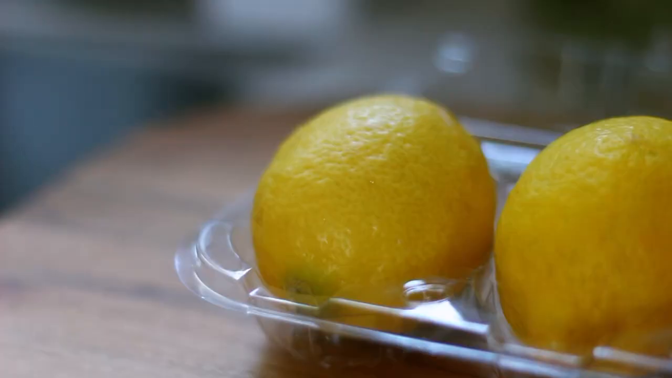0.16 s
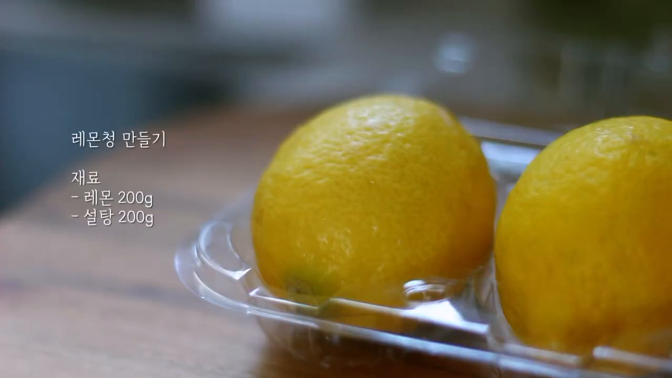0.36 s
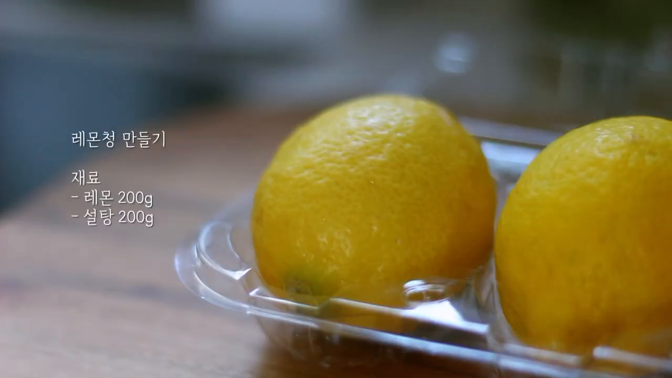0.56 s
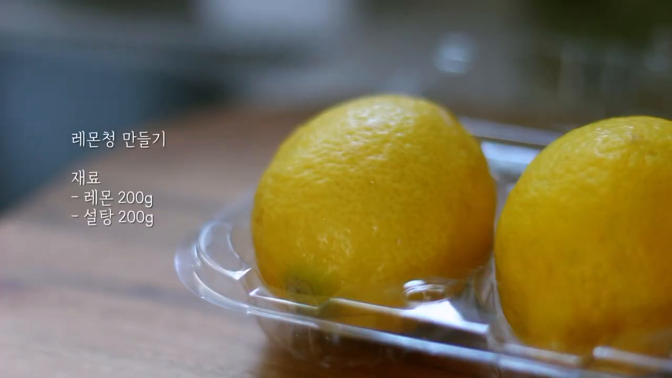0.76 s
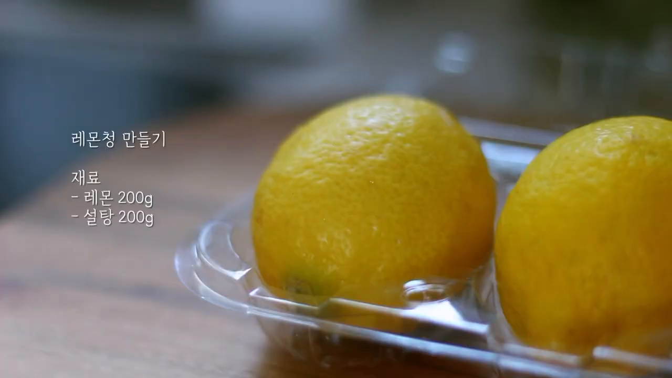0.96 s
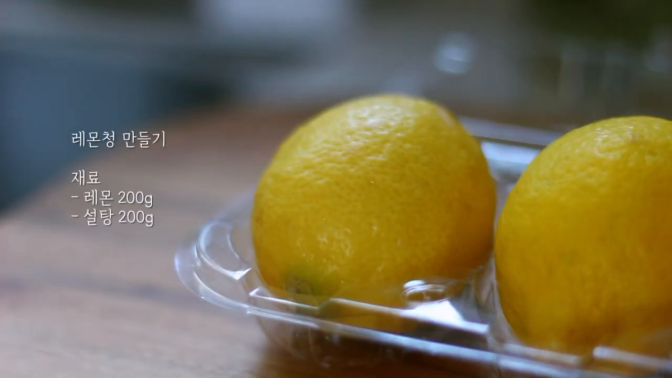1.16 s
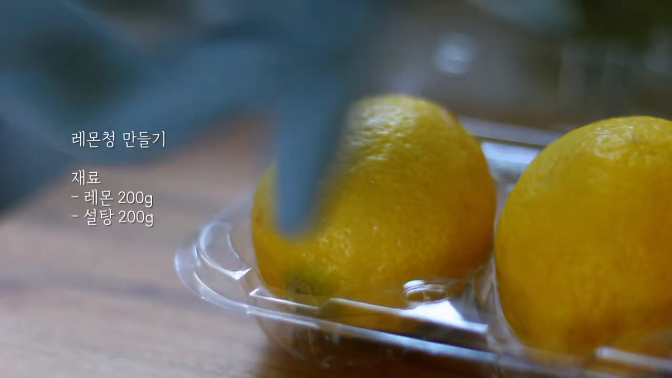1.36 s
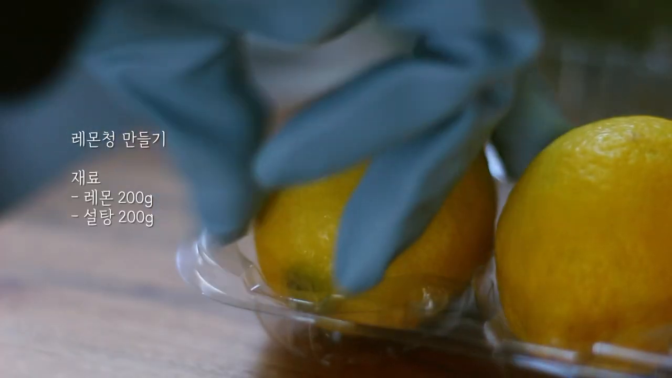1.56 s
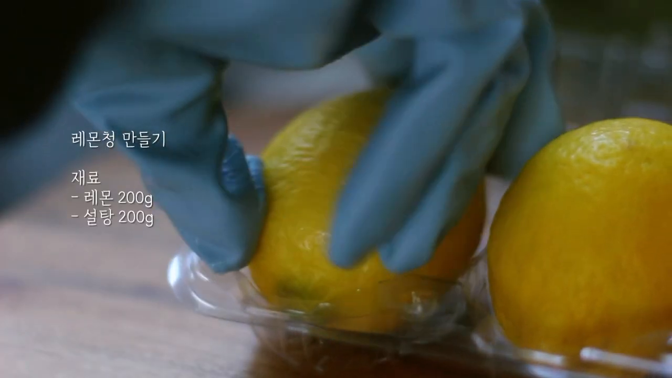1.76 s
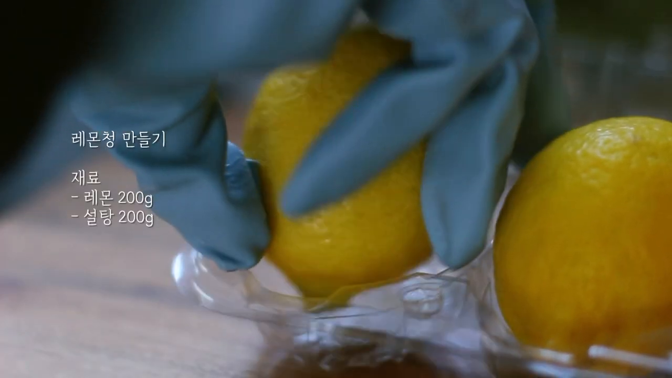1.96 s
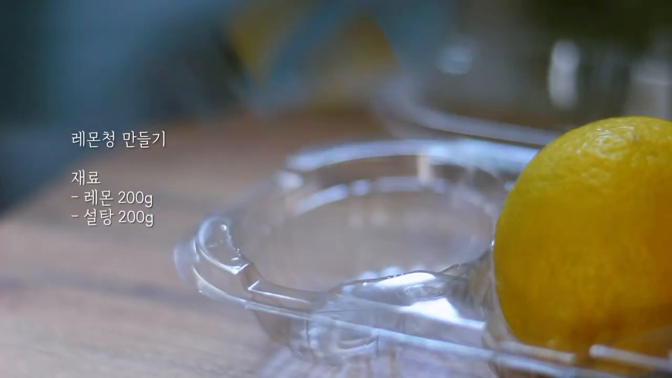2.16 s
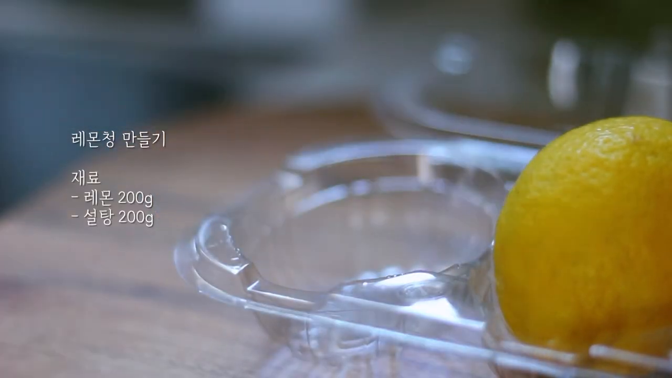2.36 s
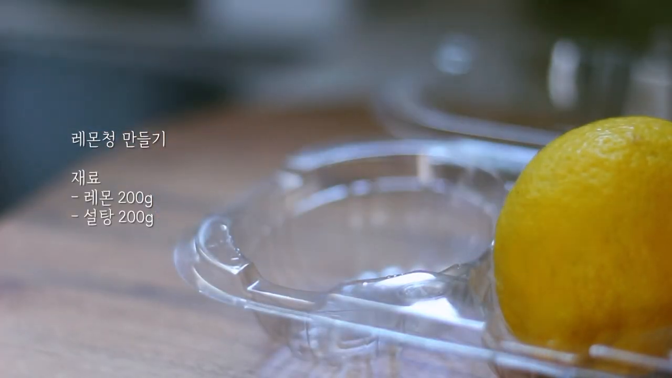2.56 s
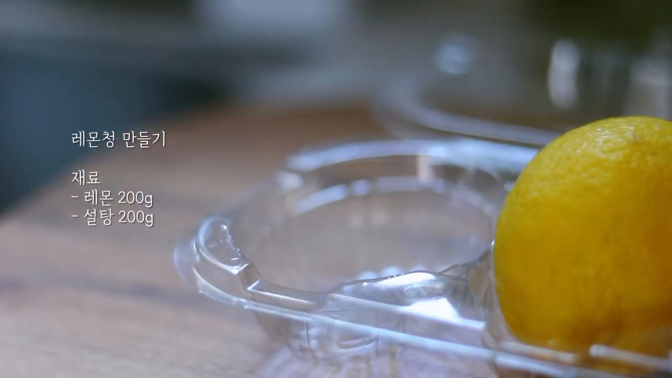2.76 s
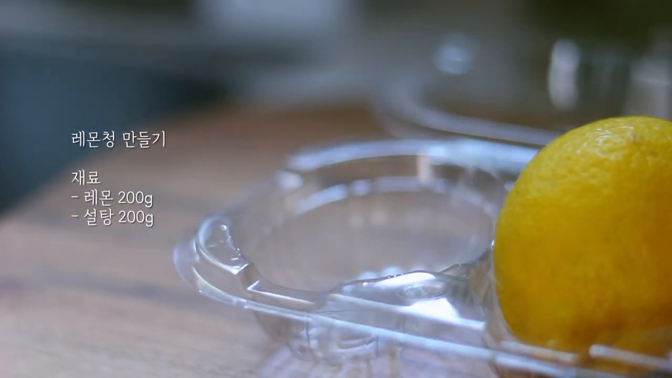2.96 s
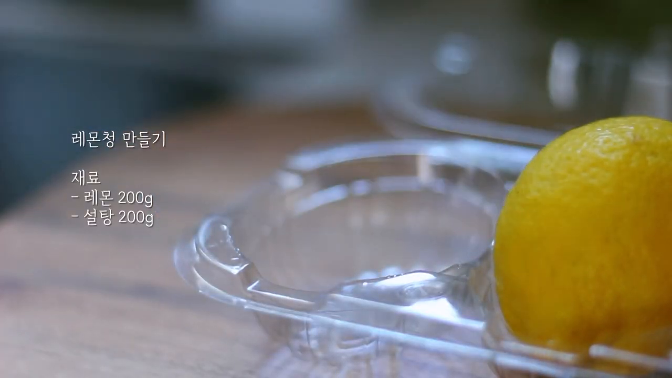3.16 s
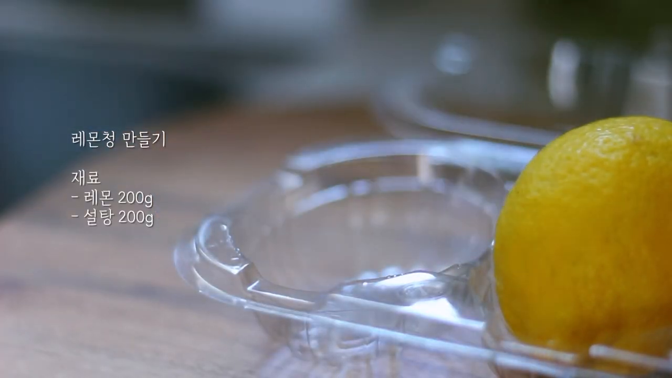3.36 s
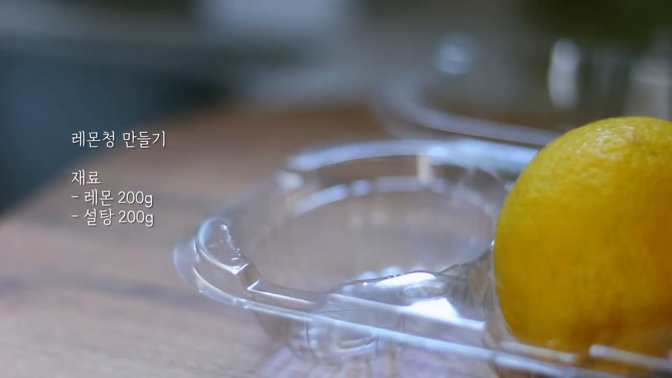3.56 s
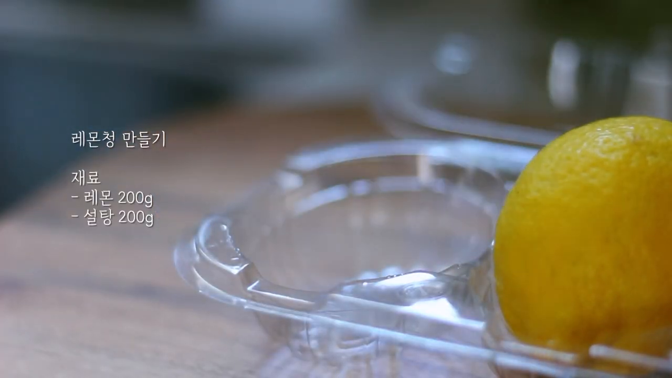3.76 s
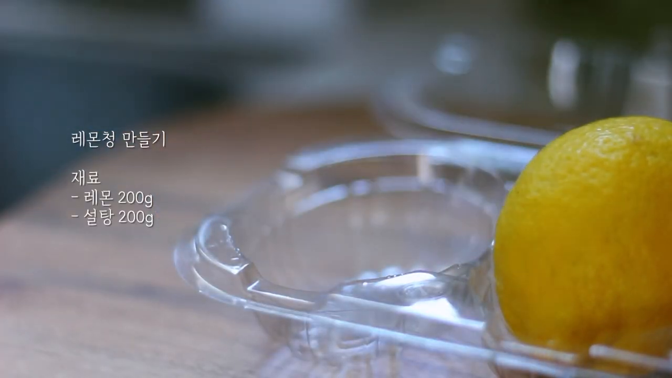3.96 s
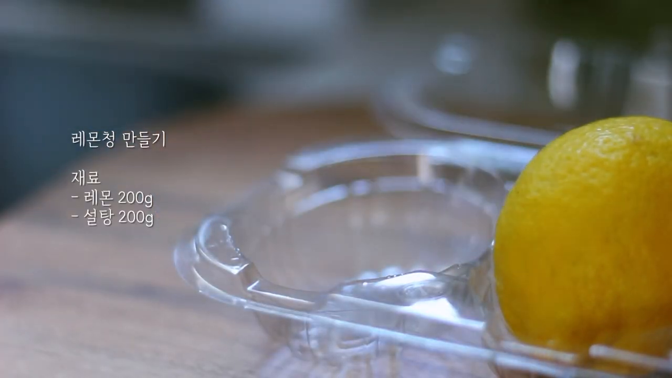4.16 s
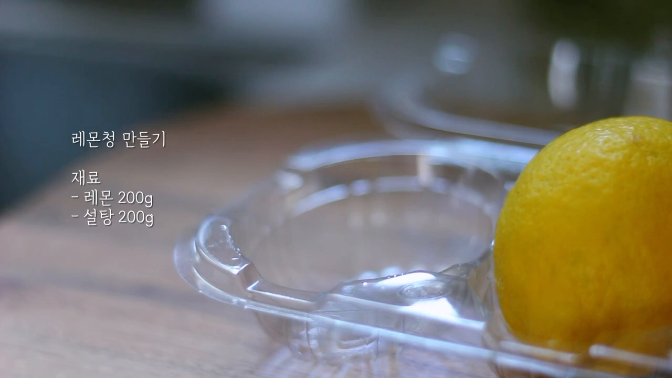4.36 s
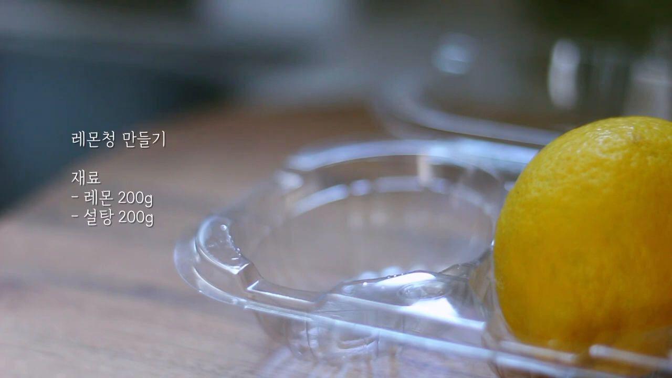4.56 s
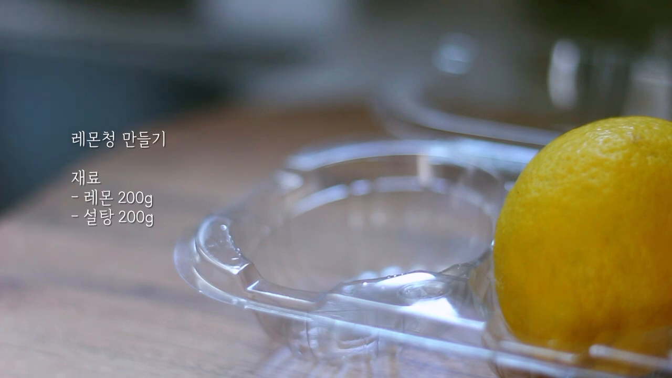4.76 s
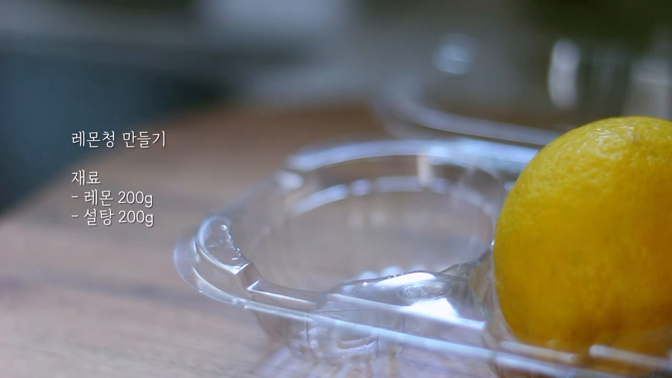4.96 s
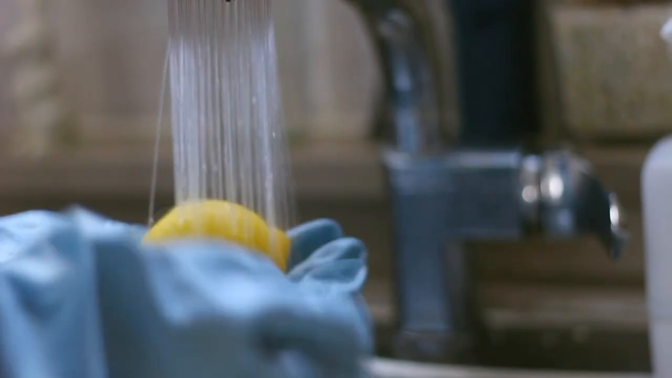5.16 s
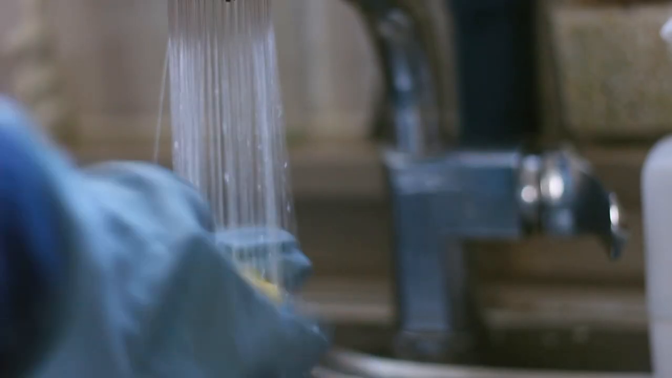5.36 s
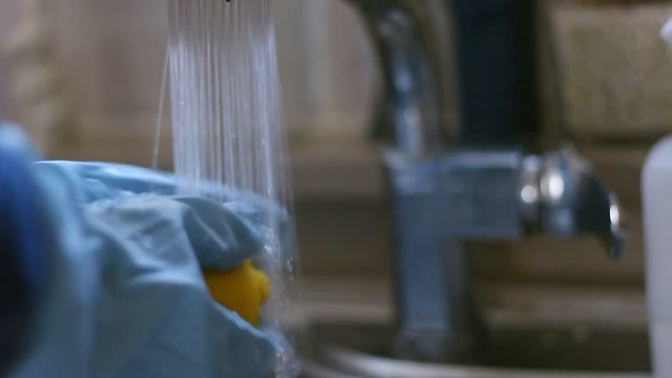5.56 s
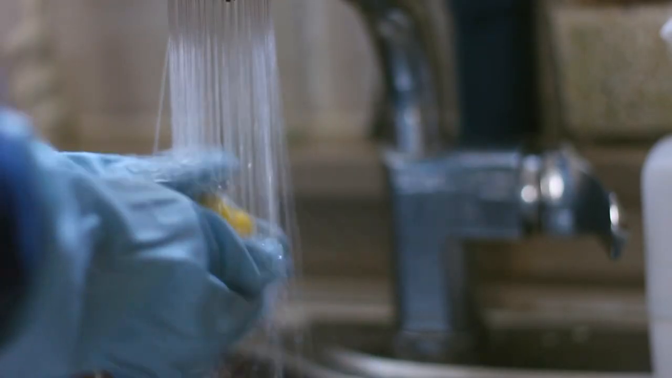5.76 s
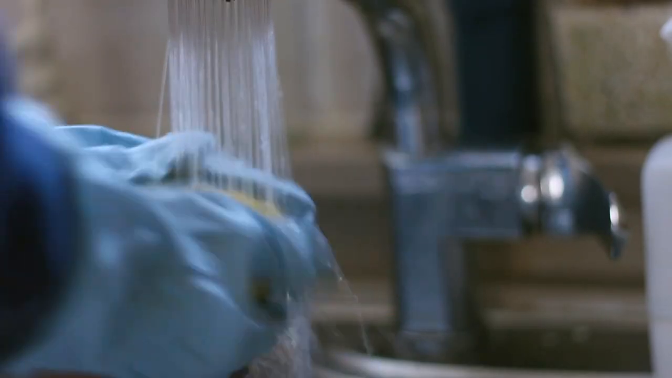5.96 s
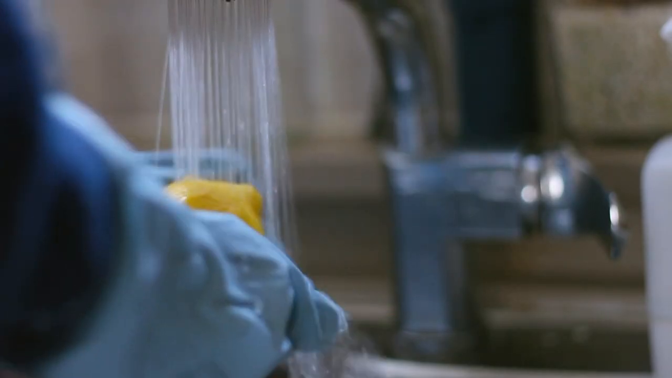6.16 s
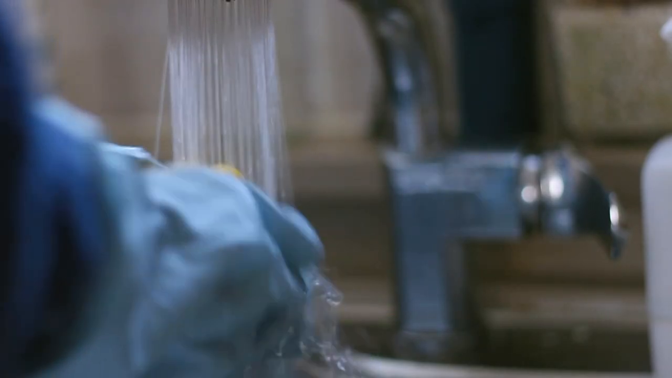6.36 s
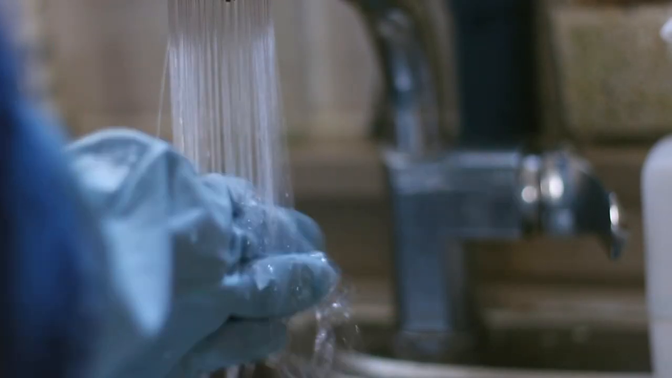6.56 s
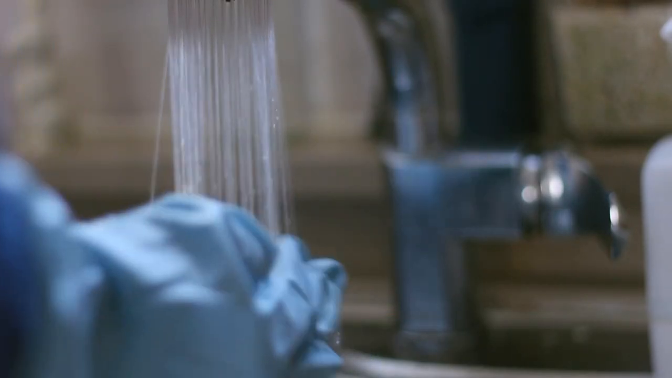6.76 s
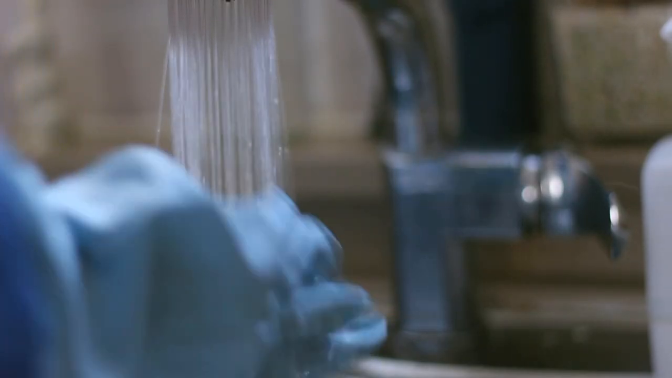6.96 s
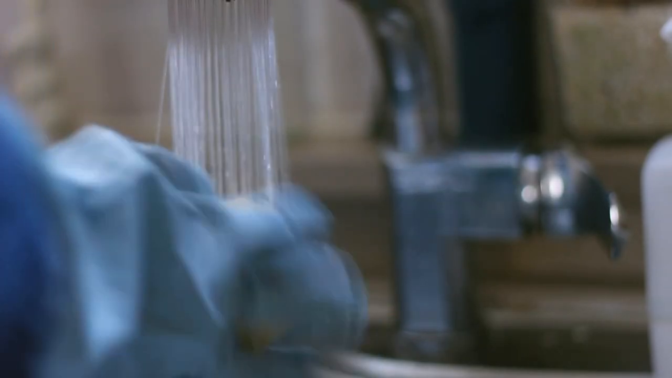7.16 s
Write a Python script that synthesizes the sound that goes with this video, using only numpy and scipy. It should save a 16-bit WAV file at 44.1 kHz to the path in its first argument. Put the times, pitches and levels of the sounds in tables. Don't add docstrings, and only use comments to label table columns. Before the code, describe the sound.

Two sharp plastic pack snaps in a quiet kitchen, light rustles and ticks, then tap spray drums and hisses into a steel sink with splats.

```python
import sys
import numpy as np
from scipy import signal
from scipy.fft import rfft, irfft
from scipy.io import wavfile

SR = 44100
rng = np.random.default_rng(int(sys.argv[2]) if len(sys.argv) > 2 else 0)


def transcribe(u):
    v = np.clip(np.atleast_2d(u).T, -1, 1)
    q = np.round(v * 32767).astype(np.int16)
    wavfile.write(sys.argv[1], SR, q)


def volts(x):
    e = np.asarray(x, float) / 20
    return 10 ** e


N = 317520

# frequency in Hz, level in dB per Hz.
SPATTER_COLOUR = [(4000, -36), (4900, 0), (6100, 7.5), (7500, -3.5), (9200, -1.5), (11500, -13),
                  (16000, -19.5)]
# start in seconds, end in seconds.
GAP_S = (5.0303, 5.0397)


def rms_one(x):
    return x / np.sqrt(np.mean(x ** 2) + 1e-20)


def in_time(rows):
    s, *columns = np.transpose(rows)
    return [np.interp(np.arange(N) / SR, s, c) for c in columns]


def drift(rate):
    r = np.exp(-40 * np.pi * rate / SR)
    white = rng.standard_normal(N // 20 + 2002)
    slow = signal.lfilter([1], [1, -2 * r, r * r], white)[2000:]
    return np.interp(np.arange(N) / 20, np.arange(len(slow)), rms_one(slow))


def resonance(x, hz, width):
    r = np.exp(-np.pi * width / SR)
    feedback = [1, -2 * r * np.cos(2 * np.pi * hz / SR), r * r]
    return signal.lfilter(np.array([1, 0, -1]) * (1 - r * r) / 2, feedback, x)


def coloured(x, spectrum, low=20, high=20000):
    hz = np.maximum(np.fft.rfftfreq(len(x), 1 / SR), 1)
    points = np.array(spectrum)
    band = 1 / np.sqrt((1 + (low / hz) ** 8) * (1 + (hz / high) ** 8))
    colour = volts(np.interp(np.log(hz), np.log(points[:, 0]), points[:, 1]))
    return rms_one(irfft(rfft(x) * band * colour, len(x)))


def grains(per_s, spread_db):
    sizes = volts(spread_db * np.minimum(rng.exponential(1, N), 4)) * rng.choice([-1, 1], N)
    return rms_one(sizes * (rng.random(N) < per_s / SR))


def droplets(per_s, low_hz, high_hz, cycles):
    clicks = grains(per_s, spread_db=4.0) + 1e-18
    dealt = rng.integers(0, 14, N)
    out = np.zeros(N)
    for k, hz in enumerate(np.geomspace(low_hz, high_hz, 14)):
        out += resonance(clicks * (dealt == k) + 1e-18, hz, 1.9 * hz / cycles) / np.sqrt(hz)
    return rms_one(out)


def add(out, s, piece):
    i = round(s * SR)
    out[i:i + len(piece)] += piece[:N - i]


def bursts(events, attack_cycles, t60, wash_t60, wash_db, width, rise, spray_db, focus):
    out, t = np.zeros(N), np.arange(4096) / SR
    noise = rng.standard_normal((len(events), len(t)))
    for (s, peak_db, hz, spatter_db), white in zip(events, noise):
        tone = np.sin(2 * np.pi * hz * t * (1 + rise * hz * t))
        tone = tone * volts(-60 * t / t60) * np.clip(t * hz / attack_cycles, 0, 1)
        tone = resonance(tone, hz, focus * hz)
        wash = rms_one(resonance(resonance(white, hz, width * hz), hz, 2 * width * hz))
        wash = volts(wash_db - 60 * t / wash_t60) * wash
        dying = volts(-60 * t / (0.11 * wash_t60)) + volts(-6.5 - 60 * t / (1.34 * wash_t60))
        spatter = volts(spray_db + spatter_db) * dying * coloured(white, SPATTER_COLOUR)
        add(out, s, volts(peak_db) * (tone + (wash + spatter) * np.clip(t / 0.00051, 0, 1)))
    return out


def snaps():
    snap_times = [
        0.3683,
        0.4969,
    ]
    # peak level in dB, cup ring in dB, table thump in dB.
    snap_levels = [
        (-0.3, -17, -55.5),
        (-2.5, -28.5, -49.5),
    ]
    # seconds after its start, level in dB.
    snap_cracks = [
        [(.0003, 4), (.0008, 0), (.0014, -2), (.002, -8)],
        [(.0003, -3), (.0009, 1), (.0017, -12), (.0026, -6)],
    ]
    # frequency in Hz, width in Hz, level in dB.
    sheet_modes = [
        [(2170, 110, -8.5), (2950, 130, -14.5), (4180, 212, -13), (5860, 280, -12), (6620, 400, -9.5),
         (7590, 270, -14.5), (9050, 250, -10.5), (9590, 400, -16.5), (3540, 270, -19), (12260, 260, -15),
         (13000, 180, -9), (13640, 108.3, -12.5), (14040, 247, 0), (15200, 240, -18.5)],
        [(2960, 234, -9.5), (4240, 147, -11.5), (3650, 250, -19), (6810, 270, -5), (7600, 120, -9.5),
         (8030, 200, -6), (8580, 201, -7.5), (10300, 150, -14.5), (11100, 290, -9), (12380, 340, -6.5),
         (13130, 230, -1), (13280, 277, -1.5), (14350, 400, -6.5), (2270, 140, -9.5)],
    ]
    # frequency in Hz, level in dB per Hz.
    kitchen_echo = [
        [(220, -47), (380, -3), (801, -2.5), (1150, -5), (3890, -14.5), (6900, -6), (8600, -7), (11100, -15.5),
         (14000, -0.5), (16000, -33)],
        [(180, -22), (801, 3.5), (2800, -22), (5200, -18), (7300, -0.5), (8600, -3), (10500, -13), (13200, 0.5),
         (14600, -14.5), (16000, -31)],
    ]
    out, t = np.zeros(N), np.arange(8000) / SR
    for s, (peak_db, cup_db, thump_db), cracking, modes, echo in zip(
            snap_times, snap_levels, snap_cracks, sheet_modes, kitchen_echo):
        crack_shape = sum(volts(db - 24000 * (t - at)) * (t > at) for at, db in cracking)
        cracks = rng.choice([-1, 1], len(t)) * crack_shape
        kicks = [1.0 * (np.arange(len(t)) == round(at * SR)) for at, db in cracking]
        ringing = np.zeros(len(t))
        for k, (hz, width, db) in enumerate(modes):
            mode = resonance(resonance(kicks[k % 3], hz, 3000), hz, 0.94 * width)
            ringing += volts(db) * mode * (-1) ** k
        body = rms_one(ringing) + volts(-19.0) * rms_one(resonance(sum(kicks), 940, 1800))
        body += volts(-9.0) * rms_one(resonance(cracks, 11500, 6000))
        cup = volts(cup_db - 60 * t / 0.038) * np.sin(2 * np.pi * 801 * t) * np.clip(t / 0.0025, 0, 1)
        thump = volts(thump_db - 60 * t / 0.25) * np.sin(2 * np.pi * 28.3 * t)
        tail = coloured(rng.standard_normal(len(t)), echo)
        tail = tail * volts(-33.0 - 60 * t / 0.17) * np.clip(t / 0.00069, 0, 1)
        add(out, s, volts(peak_db) * (body / np.abs(body).max() + tail) + cup + thump)
    return out


def stroke_gains():
    # peak time in seconds, rub in dB, crackle in dB, length in seconds.
    hand_strokes = [(0.035, -56, -57.5, 0.037), (0.238, -60, -57, 0.14), (0.503, -53, -47.5, 0.07),
                    (0.664, -56, -55.5, 0.085), (0.932, -63.5, -62, 0.23), (1.147, -69.5, -82, 0.41),
                    (1.432, -57.5, -71, 0.026), (1.529, -44, -47, 0.015), (1.58, -56.5, -60, 0.061),
                    (1.7, -54.5, -74, 0.033), (1.763, -50.5, -52.5, 0.053), (1.894, -58, -63, 0.11),
                    (1.983, -53.5, -62, 0.04), (2.086, -56, -74, 0.034), (2.327, -69, -74, 0.47),
                    (2.5, -71.5, -63, 0.078), (2.59, -46.5, -50, 0.017), (2.622, -45, -48, 0.018),
                    (2.697, -48, -49, 0.05)]
    t, power = np.arange(0, N / SR, 1 / 1000), 1e-20
    for s, rub_db, crackle_db, length in hand_strokes:
        away = (t - s) / np.where(t < s, 0.89 * length, length)
        power = power + volts(2 * (np.array([[rub_db], [crackle_db]]) - 10 * away ** 2))
    return [np.interp(np.arange(N) / SR, t, gain) for gain in np.sqrt(power)]


def rustle():
    # frequency in Hz, level in dB per Hz.
    rub_colour = [(250, -23), (450, -9), (900, -0.5), (2000, -1), (3800, -1.5), (4900, -24.5)]
    rub, crackle = stroke_gains()
    slips = rng.standard_normal((2, N)) + 0.4 * grains(per_s=2800, spread_db=1.5)
    slips = slips * volts(1.5 * drift(40))
    tiny_rings = droplets(per_s=6000, low_hz=1200, high_hz=3900, cycles=30.0)
    dull = rms_one(coloured(slips[0], rub_colour) + 0.5 * tiny_rings)
    bright = volts(-11.0) * coloured(slips[1], SPATTER_COLOUR, high=9100)
    fade = np.clip((2.74 - np.arange(N) / SR) / 0.016, 0, 1)
    return fade * (rub * dull + crackle * bright)


def pack_ticks():
    # start in seconds, peak level in dB, pitch in Hz, brightness in dB.
    sheet_ticks = [(0.607, -32, 1240, -27), (0.662, -32.5, 1310, -6), (0.89, -40.5, 1435, 1),
                   (1.184, -44.5, 1554, -23), (1.212, -46, 1750, -17), (1.298, -37, 1600, -19),
                   (1.317, -36.5, 1410, -28), (1.417, -44, 2180, -24), (1.512, -33, 2434, -11),
                   (1.526, -22, 2380, -42), (1.608, -35, 970, -24), (1.678, -32.5, 1500, -20),
                   (1.701, -34, 1195, -25.5), (1.7136, -19.5, 2300, -20), (1.789, -26.5, 2900, -5),
                   (1.8463, -21, 1710, -30), (1.9105, -29.5, 1090, -25), (1.916, -28.5, 2200, -14),
                   (1.928, -35, 2700, -20), (1.985, -36, 2000, -8), (1.975, -30, 2220, -27.5),
                   (2.054, -38.5, 1940, -15), (2.083, -34.5, 2060, -7.5), (2.23, -41, 2180, -25),
                   (2.235, -36, 1870, -28), (2.254, -42, 1912, -26.5), (2.397, -36, 3580, -19),
                   (2.424, -34.5, 3490, -12.5), (2.491, -26.5, 2720, -8), (2.529, -51, 2500, 6),
                   (0.136, -34, 930, -13),
        (0.216, -30.5, 750, -14),
        (0.27, -32, 920, -22),
        (0.555, -31, 960, -24),
        (1.537, -25, 1800, -24),
        (1.564, -43, 1520, 0),
    ]
    ticks = bursts(sheet_ticks, attack_cycles=0.029, t60=0.0033, wash_t60=0.071,
                   wash_db=-21.5, width=0.35, rise=0.001, spray_db=-11.0, focus=4.4)
    band = signal.butter(2, [600, 8000], "band", fs=SR, output="sos")
    return signal.sosfilt(band, ticks)


def spurts(per_s, t60, depth):
    r = volts(-60 / (t60 * SR))
    jumps = signal.lfilter([1], [1, -r], np.abs(grains(per_s, spread_db=3.5)))
    return rms_one(1 + depth * rms_one(jumps))


def stream_levels(rows, follows):
    # peak time in seconds, flow gain in dB, steel gain in dB.
    gush_events = [
        (2.577, -2.5, 23),
        (2.771, 4, 25),
        (4.13, 1, -2),
        (5.73, 4, 5.5),
        (6.25, 4, 2),
        (6.638, -8, 17.5),
    ]
    # start in seconds, end in seconds, drum change in dB.
    drum_lulls = [
        (4.706, 4.805, -4.5),
        (5.035, 5.085, -11),
    ]
    t, (flow_db, steel_db) = np.arange(N) / SR, in_time(rows)
    for s, flow_gain_db, steel_gain_db in gush_events:
        bell = np.exp(-((t - s) / np.where(t < s, 0.023, 0.05)) ** 2)
        flow_db = flow_db + flow_gain_db * bell
        steel_db = steel_db + steel_gain_db * bell
    drum_db, drum_flow, drum_steel, hiss_db, hiss_flow = follows
    for a, b, loss_db in drum_lulls:
        drum_db = drum_db + np.interp(t, [a - 0.02, a, b - 0.004, b], [0, loss_db, loss_db, 0])
    flow_swing = flow_db - np.median(np.array(rows)[:, 1])
    steel_swing = steel_db - np.median(np.array(rows)[:, 2])
    drum_db = drum_db + drum_flow * flow_swing + drum_steel * steel_swing
    return steel_db, drum_db, flow_db, hiss_db + hiss_flow * flow_swing


def tap(rows, follows, colour, boom, basin):
    boom_db, drum_db, splash_db, hiss_db = stream_levels(rows, follows)
    thud, wet, fine = rng.standard_normal((3, N))
    patter = grains(per_s=2900, spread_db=3.0)

    lowest = volts(boom[2]) * rms_one(resonance(thud, boom[0], boom[1]))
    low = rms_one(coloured(thud, colour, low=95, high=350) + lowest)

    rings = sum(volts(db + 1.5 * drift(16)) * rms_one(resonance(wet, hz, width)) for hz, width, db in basin)
    gurgle = droplets(per_s=180, low_hz=365.7, high_hz=1520, cycles=77.0)
    beating = coloured(thud, colour, low=354, high=1730) * volts(2.33 * drift(37.0))
    drum = rms_one(beating + 0.56 * rings + 0.35 * gurgle)

    walls = sum(volts(5.8 * drift(11.3)) * rms_one(resonance(fine, hz, 26)) for hz in boom[3:])
    drops = droplets(per_s=440, low_hz=1214, high_hz=3990, cycles=40.0)
    breaking = (wet + 0.23 * patter) * spurts(per_s=27, t60=0.04, depth=0.89)
    splash = rms_one(coloured(breaking, colour, low=1160, high=3120) + 0.91 * drops + 0.076 * walls)

    fizz = droplets(per_s=480, low_hz=5140, high_hz=9560, cycles=93.0)
    misting = (fine + 0.5 * patter) * spurts(per_s=21, t60=0.17, depth=1.0)
    spray = coloured(misting, colour, low=3650) + 0.41 * fizz

    out = volts(hiss_db - 19) * coloured(wet, colour, high=126)
    out += volts(boom_db - 1.5) * low + volts(drum_db + 0.5) * drum
    return out + volts(splash_db - 8.0) * splash + volts(hiss_db - 1.5) * spray


def running_water():
    # time in seconds, flow on the hands in dB, jets reaching the steel in dB.
    flow_curves = [
        [(2.73, -51.5, -75), (2.86, -49.5, -62.5), (3.13, -47, -52), (3.74, -45, -51.5), (3.88, -45, -57.5),
         (4.08, -45, -51), (4.66, -46.5, -64), (4.88, -43.5, -56.5), (5.02, -43, -52.5)],
        [(5.05, -44.5, -59), (5.33, -37, -62), (5.46, -40, -52), (5.62, -38, -70), (5.86, -36, -68),
         (6.0, -40.5, -66), (6.25, -41.5, -61.5), (6.95, -36, -61.5), (7.2, -42, -59.5)],
    ]
    # drum in dB, its share of the flow swing, its share of the steel swing,
    # hiss in dB, its share of the flow swing.
    flow_shares = [
        (-50.5, 1, 0.34, -47.5, 1.7),
        (-50.5, 0.1, 0.21, -47.5, 0.28),
    ]
    # frequency in Hz, level in dB per Hz.
    water_colours = [
        [(18, -43), (30, 6), (75, -1), (153, 7.5), (221, 0.5), (649, -8.5), (1390, -12), (3580, -6),
         (4650, -14.5), (6050, -15.5), (8980, -18), (14800, -35), (16000, -45)],
        [(18, -55), (30, -2), (311, 0), (426, -3.5), (649, 0), (740, 1.5), (913, -1.5), (1630, -1), (3770, 5.5),
         (4780, -6.5), (6050, -4.5), (9220, -10.5), (16000, -29)],
    ]
    # lowest basin mode in Hz, its width in Hz, its level in dB, then three wall modes in Hz.
    boom_modes = [
        (148.4, 22, 6.5, 1600, 2800, 2500),
        (186.7, 5.1, -2.5, 1300, 1900, 2800),
    ]
    # frequency in Hz, width in Hz, level in dB.
    basin_modes = [
        [(356.5, 18, -5.5), (482, 21, -5), (659, 27, -1.5), (767, 5.7, -6)],
        [(318, 21, -7), (509, 26, -5.5), (651, 18, -3), (911, 58, 6.5)],
    ]
    takes = zip(flow_curves, flow_shares, water_colours, boom_modes, basin_modes)
    first, second = [tap(*take) for take in takes]
    t = np.arange(N) / SR
    return np.where(t < GAP_S[0], first * np.clip((t - 2.5) / 0.041, 0, 1), second)


def splats():
    # start in seconds, peak level in dB, bubble pitch in Hz, spray in dB.
    heavy_splats = [(3.0868, -32, 2720, -9), (3.098, -21, 3000, -10.5), (3.1803, -22.5, 3200, -18),
                    (3.2464, -27, 3120, -5), (3.3175, -26.5, 3820, -9), (3.481, -29, 3280, -15),
                    (3.5469, -31.5, 3550, -5.5), (3.6365, -33, 3420, -2.5), (3.7509, -25, 3110, -16),
                    (3.7893, -31, 2720, -6), (3.8347, -25, 3900, -4), (4.0965, -23, 3450, -22),
                    (4.1234, -33, 3830, -1.5), (4.2627, -24, 3330, -13.5), (4.3768, -28, 3670, -1.5),
                    (4.4127, -32, 2320, 0), (4.431, -21, 2400, -17), (4.4404, -18.5, 3300, -11),
                    (4.4553, -21, 3700, -19), (4.5613, -17.5, 3230, -16.5), (4.596, -24.5, 2900, -13),
                    (4.621, -28, 3870, -26), (4.6523, -26.5, 3880, -4.5), (4.698, -26, 3700, -5.5),
                    (4.7458, -25, 3450, -7.5), (4.8093, -27.5, 3720, -23), (4.846, -30.5, 3900, -3.5),
                    (4.9034, -25.5, 2280, -18), (4.9762, -26, 2640, -9), (5.0146, -23.5, 3180, -31),
                    (5.072, -26, 3150, -18), (5.107, -29, 2120, -14), (5.1577, -40, 2100, -16),
                    (5.2103, -29, 1990, -15), (5.2717, -26.5, 3000, -12), (5.3012, -25, 3640, -25),
                    (5.3585, -28, 1380, -25), (5.3956, -26, 2480, -16), (5.4083, -20.5, 3030, -9.5),
                    (5.521, -45, 2080, -3), (5.5743, -36, 3620, -12), (5.613, -41, 3440, -4),
                    (5.7409, -25, 2730, -6), (6.007, -29.5, 1980, -42), (6.055, -30.5, 3060, -12),
                    (6.092, -22.5, 3500, -15.5), (6.2, -23.5, 1900, -40), (6.275, -23, 3320, -11.5),
                    (6.298, -21, 2950, -26), (6.343, -25.5, 3500, -11), (6.453, -22, 1520, -28),
                    (6.4815, -30.5, 2480, -6.5), (6.591, -31.5, 2400, -1), (6.635, -28.5, 3330, -12.5),
                    (6.666, -30, 2900, -11), (6.732, -30, 2470, -13), (6.776, -22.5, 2340, -31),
                    (6.834, -30, 3450, -6.5), (6.946, -20.5, 3300, -23), (6.997, -38, 2370, -35),
                    (7.1645, -25.5, 3150, -26)]
    return bursts(heavy_splats, attack_cycles=1.6, t60=0.0052, wash_t60=0.086,
                  wash_db=-11.5, width=0.37, rise=0.0014, spray_db=-2.0, focus=1.0)


def plinks():
    # start in seconds, peak level in dB, pitch in Hz, ring time in seconds.
    ringing_drops = [(2.398, -41, 3580, 0.011), (2.424, -45.5, 3600, 0.013), (3.712, -29.5, 9370, .008),
                     (3.751, -32, 3040, 0.018), (4.43, -29, 2380, 0.034), (5.083, -38, 1540, 0.067),
                     (5.105, -26.5, 2080, 0.024), (5.249, -36, 1285, .04), (5.308, -32, 3650, .03),
                     (5.423, -31, 3240, 0.024), (5.539, -38, 2260, 0.061), (5.574, -34, 3750, .02),
                     (5.597, -31, 1360, 0.032), (5.613, -33, 3680, .025), (5.67, -33, 1830, 0.022),
                     (5.690, -39, 3830, 0.062), (5.808, -34, 3680, 0.022), (5.836, -39, 2720, 0.047),
                     (5.945, -36, 1270, .03), (6.200, -24.5, 3010, 0.025), (6.212, -31.5, 324, 0.084),
                     (6.275, -30, 3740, 0.025), (6.298, -19.5, 3120, 0.02), (6.342, -16.5, 3800, 0.01),
                     (6.411, -30, 1380, .02), (6.454, -22.5, 1413, 0.022), (6.577, -42, 990, 0.019),
                     (6.693, -34, 1330, 0.023), (6.775, -18.5, 3060, 0.015), (6.835, -31.5, 3500, .025),
                     (6.910, -35, 3730, 0.022), (6.947, -37, 3500, 0.069), (6.996, -23, 2460, 0.042),
                     (7.049, -30, 1370, 0.028), (7.057, -38, 4050, 0.05), (7.089, -38, 3730, .03),
                     (7.192, -30.5, 3580, 0.036), (6.990, -27, 907, 0.039), (6.428, -31, 892, 0.061),
                     (7.131, -29.5, 1329, 0.06), (4.562, -24, 3100, 0.013), (3.182, -29, 3420, 0.015),
                     (6.885, -37, 3250, 0.035)]
    out, t = np.zeros(N), np.arange(4096) / SR
    for s, peak_db, hz, ring_s in ringing_drops:
        swell = np.sin(np.pi / 2 * np.clip(t * hz / 5, 0, 1)) ** 2
        tone = np.sin(2 * np.pi * hz * t * (1 + 0.00028 * hz * t))
        add(out, s, volts(peak_db + 1.5 - 60 * t / ring_s) * swell * tone)
    return out


def spits():
    # start in seconds, peak level in dB, pitch in Hz.
    spray_spits = [(2.765, -27, 8110), (2.7733, -27, 9400), (3.05, -35, 6170), (3.0726, -35, 8020),
                   (3.253, -34, 6460), (3.296, -29, 8000), (3.3945, -27, 8250), (3.449, -30, 9500),
                   (3.553, -34, 7320), (3.6182, -38, 6060), (3.697, -39, 6080), (3.7115, -29.5, 9000),
                   (3.737, -36, 6090), (3.7624, -34, 6500), (3.934, -32, 5690), (3.9496, -24.5, 5740),
                   (3.9647, -26.5, 8600), (3.9896, -31, 9330), (4.056, -29, 5600), (4.1829, -41, 5740),
                   (4.219, -31, 6240), (4.2577, -27, 5640), (4.3141, -30, 7300), (4.376, -34, 6100),
                   (4.487, -33, 8150), (4.8704, -31, 8580), (4.9248, -29, 5800), (5.1302, -35, 5380),
                   (5.1886, -33.5, 6180), (5.286, -30, 5700), (5.3133, -31.5, 9050), (5.3354, -37, 5410),
                   (5.4515, -40, 6310), (5.477, -52, 5910), (5.52, -25, 8870), (5.5992, -45, 6070),
                   (5.6317, -30.5, 6230), (5.685, -31, 5960), (5.9728, -31, 5540), (6.0177, -33, 5840),
                   (6.0338, -29, 5570), (6.1749, -34, 5100), (6.2447, -33, 5840), (6.318, -24.5, 5750),
                   (6.3784, -28, 5560), (6.403, -30, 7200), (6.4587, -37, 6030), (6.5112, -24.5, 4680),
                   (6.534, -30.5, 6300), (6.5917, -37, 5720), (6.694, -23.5, 5860), (6.761, -32.5, 5800),
                   (6.877, -26.5, 6500), (6.9386, -33, 5840), (7.0359, -36, 5390)]
    return bursts([(*spit, -10) for spit in spray_spits], attack_cycles=5.7, t60=0.0056, wash_t60=0.094,
                  wash_db=-18.0, width=0.13, rise=0.0012, spray_db=-3.5, focus=0.83)


def plops_and_knocks():
    # start in seconds, peak level in dB, pitch in Hz.
    hollow_plops = [(4.056, -41, 760), (4.094, -41, 775), (4.121, -43, 793), (4.801, -44, 693),
                    (5.208, -43, 660), (5.358, -40, 1076), (6.024, -36, 884), (6.216, -29, 653),
                    (6.411, -38.5, 910), (6.429, -47, 920), (6.777, -34, 1330), (6.875, -35.5, 1280),
                    (6.937, -33, 1430), (7.037, -41, 1310), (7.104, -40.5, 913), (7.133, -39, 1302)]
    dull_knocks = [
        (0.501, -44.5, 343),
        (0.554, -54, 273),
        (0.658, -57, 247),
        (1.846, -52, 830),
        (4.43, -49, 110),
        (5.36, -43, 750),
        (5.825, -46.5, 284),
        (6.214, -37, 458),
        (6.345, -41, 295),
        (6.59, -41, 303),
    ]
    return bursts([(*plop, -40) for plop in hollow_plops + dull_knocks], attack_cycles=0.45, t60=0.086,
                  wash_t60=0.1, wash_db=-4.0, width=0.79, rise=0.0005, spray_db=-8.5, focus=2.7)


def pricks():
    # start in seconds, peak level in dB.
    fine_pricks = [(2.766, -37), (2.773, -34), (3.4499, -44), (3.5467, -40), (3.7114, -41), (3.7627, -36.5),
                   (3.8336, -47), (3.9867, -37), (4.0551, -38), (4.097, -42), (4.2631, -34), (4.314, -40),
                   (4.3709, -44), (4.5589, -42), (4.747, -41), (5.3581, -47.5), (5.4085, -36),
                   (5.5202, -34), (5.737, -33), (6.2491, -39), (6.3177, -35), (6.512, -35), (6.5928, -45),
                   (6.939, -36.5), (7.1311, -48)]
    out, t = np.zeros(N), np.arange(1024) / SR
    for (s, peak_db), white in zip(fine_pricks, rng.standard_normal((len(fine_pricks), len(t)))):
        bright = rms_one(resonance(resonance(white, 10300, 6000), 11000, 9000))
        add(out, s, volts(peak_db - 6.0 - 60 * t / 0.03) * bright)
    return out


def mist():
    hiss = coloured(rng.standard_normal(N), [(5000, -31), (11000, -7.5), (16000, -8.0)])
    return volts(-63) * hiss * (np.arange(N) / SR > 2.58)


def room():
    # frequency in Hz, level in dB per Hz.
    room_colour = [(18, -54), (30, -4), (221, -9), (266, -11.5), (336, -5.5), (666, -16), (889, -16.5),
                   (1100, -31.5), (1350, -18), (16000, -25.5)]
    return volts(-64.5 - 3.5) * coloured(rng.standard_normal(N), room_colour)


def scene():
    t = np.arange(N) / SR
    pack = snaps() + rustle() + pack_ticks()
    water = running_water() + splats() + plinks() + spits() + plops_and_knocks() + pricks()
    heard = np.clip(np.maximum(GAP_S[0] - t, t - GAP_S[1]) / 0.00018, 0.04, 1)
    return ((pack + water + mist() + room()) * heard)[None]


def band_limit(x):
    return signal.sosfilt(signal.butter(12, 16830, fs=SR, output="sos"), x)


def record(dry):
    low_pass = signal.cheby2(14, 70, 16600, fs=SR, output="sos")
    return band_limit(signal.sosfilt(low_pass, dry))


dry = scene()
out = record(dry)
transcribe(out)
```